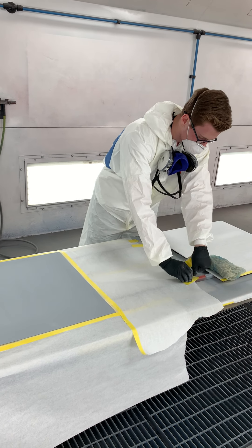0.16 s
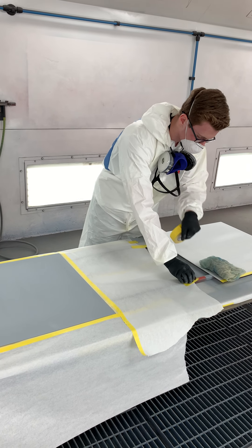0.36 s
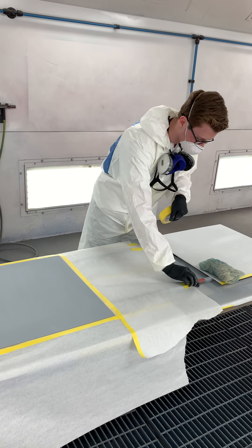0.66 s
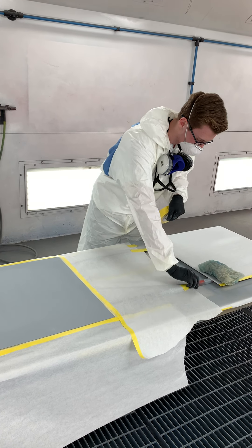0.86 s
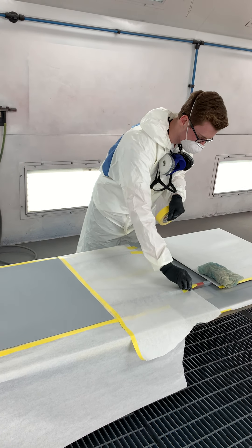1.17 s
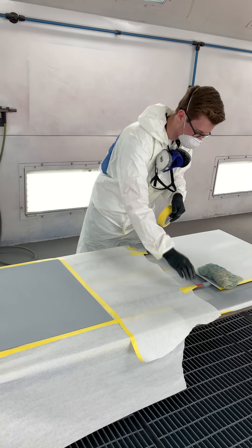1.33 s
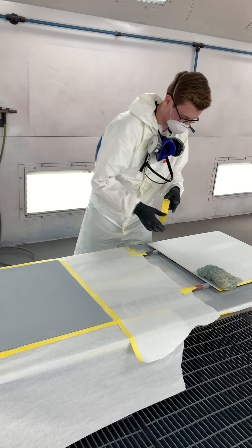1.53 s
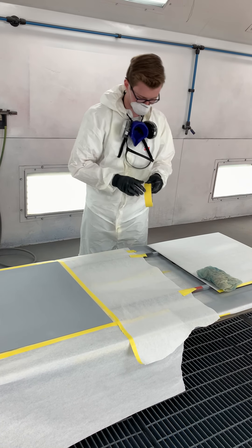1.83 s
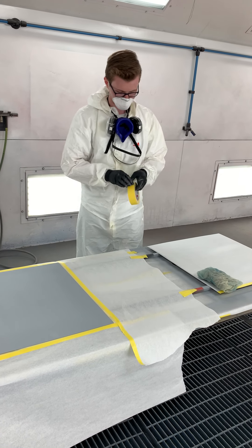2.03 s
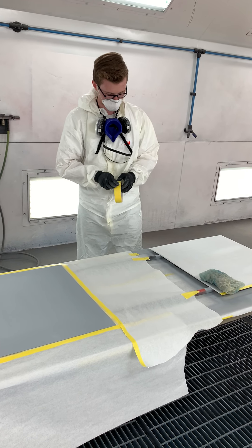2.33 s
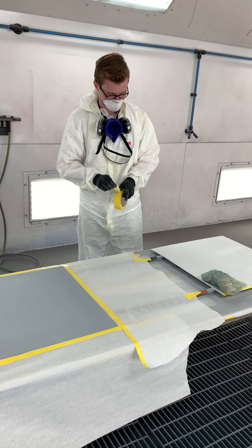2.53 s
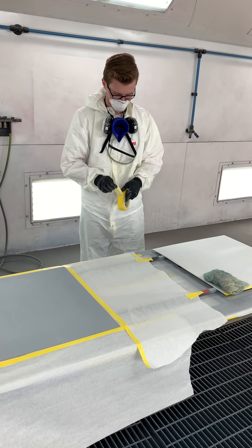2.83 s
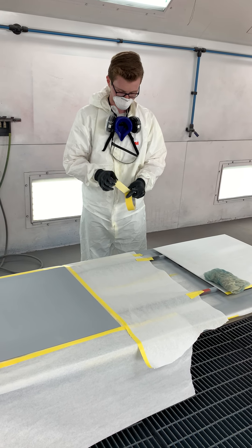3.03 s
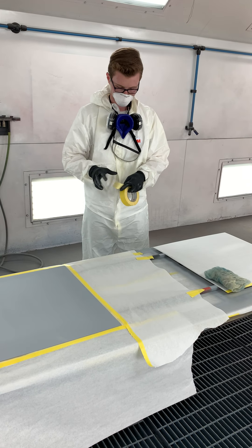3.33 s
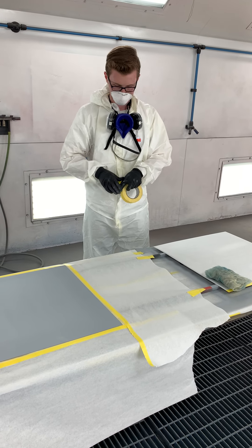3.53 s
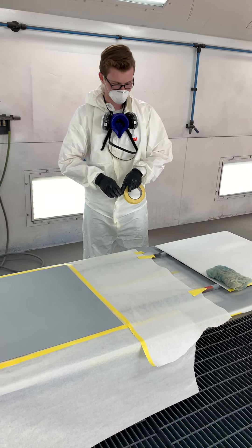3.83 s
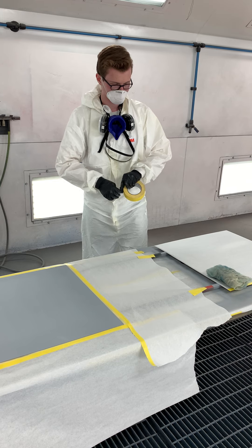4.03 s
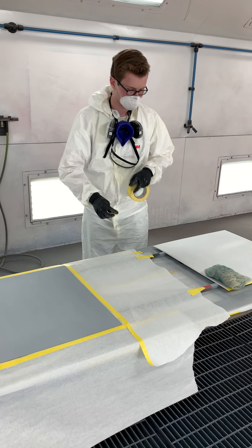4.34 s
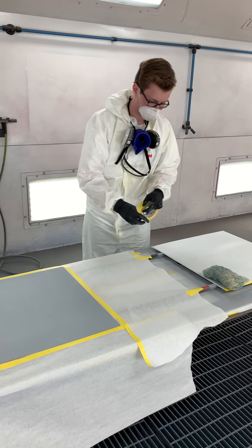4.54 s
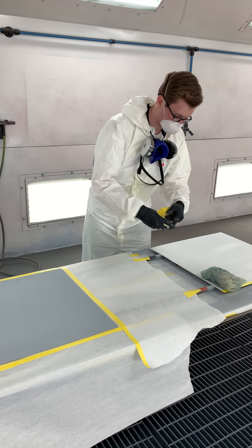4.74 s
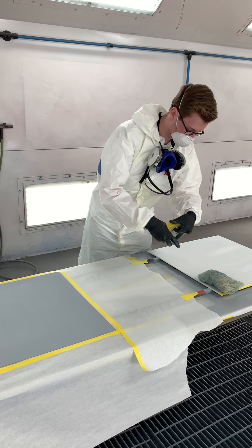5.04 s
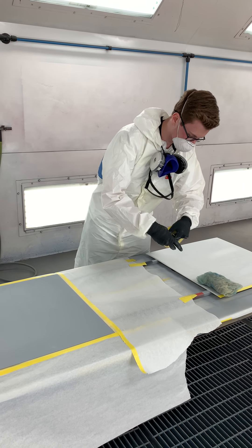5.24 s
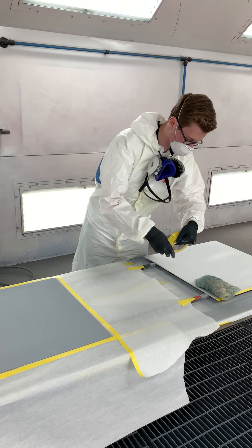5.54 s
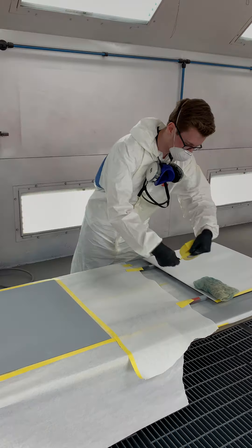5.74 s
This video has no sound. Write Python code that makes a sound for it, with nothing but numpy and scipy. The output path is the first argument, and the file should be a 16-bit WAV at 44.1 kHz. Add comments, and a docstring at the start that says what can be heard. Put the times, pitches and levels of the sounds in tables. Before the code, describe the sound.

In a bare steel spray booth, ventilation rumbles and lamps hum throughout. Gloves rustle and crackle on masking paper for the first second and a half. Around two and a half seconds tape peels off the roll in a brief rip, then tears with a loud snap. Sparse handling follows, with a sharp click just after four seconds. A stereo phone a few steps away catches the ringing walls.

```python
"""Over a steady ventilation rumble and lamp hum, gloves and tape rustle on paper from the start, with small cracks.
A painter in a paper coverall presses masking tape onto masking paper in a steel spray booth; about two and
a half seconds in he pulls a strip off the roll and tears it. Rips and rustles are grains of crackle shaped by
filters, cracks and pops are decaying noise bursts, and fan, lamps and booms are sines and shaped noise.
The bare walls ring after each handling sound; a phone with two microphone ports stands a few steps away."""
import sys
import numpy as np
from scipy import signal
from scipy.fft import rfft, irfft, next_fast_len
from scipy.io import wavfile
from scipy.ndimage import uniform_filter1d

SR = 44100
rng = np.random.default_rng(int(sys.argv[2]) if len(sys.argv) > 2 else 0)


def master_out(mix):
    """Clip the mix to full scale and print it as 16-bit PCM to the path in sys.argv[1]."""
    frames = np.transpose(np.atleast_2d(mix))
    ceiling = np.clip(frames, -1, 1)
    pcm = np.round(ceiling * 32767).astype(np.int16)
    wavfile.write(sys.argv[1], SR, pcm)


N = 259749
TIME = np.arange(N) / SR


def amp(db):
    """Decibel law: 20 dB is a factor of ten in amplitude."""
    return 10 ** (np.asarray(db) / 20)


def evened(x):
    """Normalisation to unit mean power: scales x to rms 1."""
    return x / np.sqrt(np.mean(x ** 2) + 1e-20)


def wander(seconds):
    """Random modulation: white noise smoothed over this time, at rms 1."""
    return evened(uniform_filter1d(rng.standard_normal(N), max(int(seconds * SR), 1)))


def arch(middle, length):
    """Raised-cosine envelope: a smooth swell from 0 to 1 and back over the length."""
    phase = np.pi * np.clip((TIME - middle) / length, -.5, .5)
    return np.cos(phase) ** 2


def read(points, hz):
    """Logarithmic frequency scale: joins the points of a spectrum table along it."""
    f, value = np.transpose(points)
    return np.interp(np.log(hz + 1), np.log(f + 1), value)


def follow(rows, t):
    """Linear interpolation of a (time, value) curve at times t."""
    seconds, value = np.transpose(rows)
    return np.interp(t, seconds, value)


def add(mix, s, sound):
    """Superposition: lays a sound into the mix at time s."""
    part = mix[max(round(s * SR), 0):][:len(sound)]
    part += sound[:len(part)]


def colour(x, spectrum, tilt=0, peaks=(), size=2048):
    """Minimum-phase filtering at unit energy; the tilt in dB per octave acts above 500 Hz."""
    hz = abs(np.fft.fftfreq(size, 1 / SR))
    db = read(spectrum, hz) + tilt * np.log2(np.maximum(hz, 500) / 500)
    db = db + sum(lift / (1 + (2 * (hz - f) / width) ** 2) for f, width, lift in peaks)
    # the Hilbert transform of the log gain gives the minimum phase
    response = np.exp(np.conj(signal.hilbert(np.log(amp(db)))))
    taps = np.fft.ifft(response).real[:size // 2]
    return signal.oaconvolve(x, taps / np.linalg.norm(taps))[:len(x)]


def crackle(per_s, spread_db, clump_db, clump_s):
    """Stick-slip friction: impulses of random size and sign whose strength clumps in time, at rms 1."""
    happens = rng.random(N) < per_s / SR
    size = rng.exponential(1, N)
    sign = rng.choice([-1, 1], N)
    clumps = wander(clump_s)
    size_db = spread_db * np.minimum(size, np.pi) + clump_db * np.clip(clumps, -2, 2)
    return evened(happens * sign * amp(size_db))


def wash(spectrum):
    """Turbulence noise: two unrelated steady Gaussian noises shaped to this spectrum, at rms 1."""
    size = next_fast_len(N)
    shape = amp(read(spectrum, np.fft.rfftfreq(size, 1 / SR)))
    return evened(irfft(rfft(rng.standard_normal((2, size))) * shape)[:, :N])


def resonate(x, hz, width):
    """Heterodyne resonance: shifts x down by the curve hz, low-passes it with a double pole and shifts it back."""
    turn = np.exp(2j * np.pi * np.cumsum(hz) / SR)
    r = np.exp(-np.pi * width / SR)
    slow = signal.lfilter([(1 - r) ** 2], [1, -2 * r, r * r], x / turn + 1e-18)
    return 2 * (turn * slow).real


def buckle(x, depth_db, patch_hz, patch_s, size=256):
    """Changing modes of a thin sheet: its shape changes, so patches of its spectrum swell and sink at random."""
    z = signal.stft(x, nperseg=size)[2]
    patch_bins = max(round(patch_hz * size / SR), 1)
    patch_frames = max(round(2 * patch_s * SR / size), 1)
    field = uniform_filter1d(rng.standard_normal(z.shape), patch_bins, axis=0)
    field = evened(uniform_filter1d(field, patch_frames, axis=1))
    gain = evened(amp(depth_db * np.clip(field, -2, 2)))
    return signal.istft(z * gain, nperseg=size)[1][:len(x)]


# Spectra of the duct drone, the rumble and the rush of air.
# Each row: frequency in Hz, relative density in dB per Hz.
DUCT_DRONE = [(15, -43.5), (27, -33.5), (35, 1.5), (41, -4), (52, -6), (70, -14), (150, -75.5)]
DUCT_RUMBLE = [(30, -48), (55, -1), (75, 3.5), (88, 3), (108, 5.5), (140, -22), (300, -59)]
AIR_RUSH = [(60, -11), (130, 7), (180, 0.5), (280, 3.5), (400, -2.5), (600, -8.5), (1000, -24.5),
            (3000, -28), (8000, -40), (16000, -39)]
AIR_DB = -57.5
RUMBLE_DB, SURGE_DB, SURGE_S = -53, 2.5, 0.35  # level, random swell, time over which the swell is smoothed
FAN_HZ = 74.8  # blade rate


def ventilation():
    """Fan and duct noise: shaped turbulence, and sines at the blade rate and half of it with wandering phase."""
    drone = amp(-51.5) * wash(DUCT_DRONE)
    rumble = amp(RUMBLE_DB + SURGE_DB * wander(SURGE_S)) * wash(DUCT_RUMBLE)
    air = amp(AIR_DB) * wash(AIR_RUSH)
    blade = amp(-57.5) * np.sin(2 * np.pi * FAN_HZ * TIME + .5 * wander(1 / 3))
    # half the blade rate, buffeted by the air
    shaft = amp(-48.5) * np.sin(np.pi * FAN_HZ * TIME + 1.34 * wander(1 / 14))
    return drone + rumble + air + blade + shaft


WHISTLE_HZ, WHISTLE_DB, WHISTLE_WAVER = 536, -67.5, .25  # pitch, rms level, rms phase wander in radians


def whistle():
    """Standing wave: a faint fan tone between the walls meets the two ports in opposite phase."""
    phase = 2 * np.pi * WHISTLE_HZ * TIME + WHISTLE_WAVER * wander(1 / 4)
    tone = np.sqrt(2) * amp(WHISTLE_DB) * np.sin(phase)
    return np.array([tone, -tone])


# Swelling and sinking of the lowest hum line. Each row: time in seconds, rms level in dB.
HUM_LEVEL = [(0, -62), (.5, -55.5), (.8, -60), (1.15, -55.5), (1.7, -70.5), (2.3, -56), (2.95, -57.5),
             (3.3, -55), (3.75, -54), (4, -67), (4.9, -57), (5.25, -52), (5.8, -52.5)]
# Steady upper lines of the hum. Each row: frequency in Hz, rms level in dB.
HUM_OVERTONES = [(240, -63), (720, -76)]
HUM_HZ = 120


def lamps():
    """Harmonic mains hum: sines at multiples of one pitch, the lowest swelling and sinking."""
    lines = [(HUM_HZ, follow(HUM_LEVEL, TIME))] + HUM_OVERTONES
    return sum(np.sqrt(2) * amp(db) * np.sin(2 * np.pi * (hz * TIME + rng.random())) for hz, db in lines)


# Movements of arms and body that rub the coverall. Each row: middle in seconds, length in seconds,
# level in dB before the common trim, tilt in dB per octave.
RUBS = [(0.244, 1.55, -56.5, -0.5), (0.76, 0.98, -57, -1.5), (1.467, 1.02, -55, -1), (2.143, 1.67, -61, 0),
        (3.443, 0.41, -60.5, 1.5), (3.676, 0.18, -60.5, 4), (4.135, 0.78, -67, 1), (4.537, 1.7, -58.5, -2),
        (5.031, 0.795, -68.5, -3.5), (5.205, 0.38, -67.5, -5), (5.98, 1.21, -55.5, 1),
        (5.9, 0.79, -62.5, 2.5)]
# Spectrum of rubbed cloth. Each row: frequency in Hz, relative density in dB per Hz.
CLOTH_SPECTRUM = [(150, 2.5), (400, -1), (900, -2), (1600, 1.5), (2600, 2), (4000, 2), (7000, -10),
                  (11000, -14.5), (16000, -25.5)]


def coverall():
    """Cloth friction: crackle of soft rubbing that swells and sinks with each movement."""
    grain = crackle(per_s=7000, spread_db=2.0, clump_db=0.0, clump_s=0.004)
    rubs = sum(amp(db) * colour(grain * arch(middle, length), CLOTH_SPECTRUM, tilt)
               for middle, length, db, tilt in RUBS)
    return amp(-2.0) * rubs


# Leans and shifts of weight that make panel and floor grating boom. Each row: middle in seconds,
# length in seconds, level in dB, pitch in Hz.
WEIGHT_SHIFTS = [(0.298, 0.79, -50.5, 75.3), (0.827, 0.77, -52.5, 105.2), (1.377, 0.4, -53.5, 109.3),
                 (4.402, 0.29, -46, 76.66)]
BOOM_WAVER = .4  # rms phase wander in radians


def grating():
    """Low plate modes: a soft sine boom with wavering phase under each shift of weight."""
    waver = BOOM_WAVER * wander(1 / 12)
    return sum(np.sqrt(2) * amp(db) * arch(middle, length) * np.sin(2 * np.pi * hz * TIME + waver)
               for middle, length, db, hz in WEIGHT_SHIFTS)


# Folds of sleeve or tape sliding past. Each row: middle in seconds, length in seconds,
# level in dB before the common trim, first and last pitch of the hollow in Hz.
FOLD_SLIDES = [(0.04, 0.17, -55, 3270, 3100), (0.203, .3, -49, 2430, 2250), (0.784, 0.12, -52, 696, 1080),
               (1.852, 0.83, -71, 2030, 1702), (2.482, 0.13, -50, 1190, 840),
               (4.331, 0.054, -44, 2860, 3260), (4.256, 1, -64.5, 515, 696), (4.94, 0.87, -67.5, 900, 1326),
               (5.147, 0.56, -67.5, 2280, 1980), (5.295, 0.34, -70, 1145, 1345),
               (5.779, 0.26, -82, 800, 1067)]
HOLLOW_WIDTH_HZ = 680  # of each of the two poles


def swishes():
    """Cavity resonance: the crackle of a sliding fold heard through a hollow whose pitch drifts."""
    grain = crackle(per_s=2900, spread_db=1.0, clump_db=2.5, clump_s=0.01)
    out = np.zeros(N)
    for middle, length, db, first_hz, last_hz in FOLD_SLIDES:
        on = abs(TIME - middle) < length / 2
        pitch = np.linspace(first_hz, last_hz, on.sum())
        rustle = resonate(grain[on], pitch, HOLLOW_WIDTH_HZ)
        out[on] += amp(db) * arch(middle, length)[on] * evened(rustle)
    return amp(-5.5) * out


# Strokes of glove and tape on paper. Each row: start in seconds, level in dB, length in seconds,
# tilt in dB per octave.
PAPER_STROKES = [(0.0, -44, 0.0032, 2.5), (0.139, -46, 0.0052, -0.5), (0.177, -44, 0.003, 1.5),
                 (0.258, -44, 0.016, 1.5), (0.29, -50, 0.02, 4.5), (0.45, -57.5, 0.02, 8.5),
                 (0.486, -46, 0.057, 1), (0.53, -53, 0.011, 14.5), (0.59, -49.5, 0.0071, 6.5),
                 (0.729, -45, 0.09, 0.5), (0.803, -42.5, 0.02, 3), (0.936, -41.5, 0.063, -1),
                 (1.182, -32.5, 0.029, 1.5), (1.284, -44.5, 0.11, 0), (1.642, -57, 0.077, -3.5),
                 (2.071, -59.5, 0.028, 5), (2.278, -64, 0.11, 13), (3.058, -51.5, 0.097, 7),
                 (3.203, -53, 0.062, 3.5), (3.857, -64, 0.009, -1.5), (3.979, -67, 0.041, 14),
                 (4.1033, -32.5, 0.024, 8), (4.29, -47.5, 0.068, 6.5), (4.558, -56, 0.036, 13),
                 (4.68, -62, 0.046, 12), (4.737, -54, 0.074, 6.5), (5.058, -64, 0.024, 4),
                 (5.528, -64, 0.0099, 8.5)]
# Spectrum of handled paper. Each row: frequency in Hz, relative density in dB per Hz.
PAPER_SPECTRUM = [(100, -13), (250, -1), (500, -5.5), (1000, 0.5), (1800, 5), (2500, 3), (4000, 5),
                  (6500, -1), (9000, -7), (12500, -13), (16000, -22)]
# Resonances of the paper over the panel. Each row: frequency in Hz, width in Hz, lift in dB.
SHEET_MODES = [(590, 63, 3), (831, 86, 6.5), (1770, 290, 5), (2600, 390, 7)]
STROKE_RISE, STROKE_FADE_S = 0.47, 0.033  # share of the length spent swelling; decay time afterwards
CREASES_PER_S, CREASES_DB = 250, -8.5  # stray ticks within a stroke: rate, level against the rustle


def strokes():
    """Friction on a resonant sheet: each stroke is a short swell of crackle, tilted by its row."""
    out, t = np.zeros(N), np.arange(SR // 4) / SR
    rustle = crackle(per_s=10000, spread_db=1.2, clump_db=0.8, clump_s=0.0037)
    ticks = crackle(per_s=CREASES_PER_S, spread_db=1.5, clump_db=0.0, clump_s=0.0076)
    grain = rustle + amp(CREASES_DB) * ticks
    for s, db, length, tilt in PAPER_STROKES:
        rise = np.minimum(t / (STROKE_RISE * length), 1)
        swell = rise * np.exp(-np.maximum(t - length, 0) / STROKE_FADE_S)
        slips = grain[max(round(s * SR), 0):][:len(t)]
        add(out, s, amp(db) * colour(slips * swell[:len(slips)], PAPER_SPECTRUM, tilt, SHEET_MODES))
    return out


# Creases snapping over. Each row: start in seconds, level in dB, decay time in seconds,
# tilt in dB per octave.
CREASE_SNAPS = [(0.138, -31.5, 0.0014, 1.5), (0.145, -39, 0.0022, 2), (0.1758, -31.5, 0.0024, 5),
                (0.267, -33, 0.0028, 5), (0.283, -38, 0.0011, 10), (0.548, -38.5, 0.0018, 12),
                (0.776, -25, .0004, 10), (0.7875, -23.5, 0.0044, 6), (0.8252, -22.5, 0.0009, 10),
                (0.956, -39.5, 0.00098, 4), (0.9612, -25.5, 0.0011, 8), (0.9692, -18, 0.0006, 18.5),
                (1.207, -26, .0004, 18), (1.294, -29.5, 0.0013, 5), (1.3425, -28, 0.0021, 11),
                (1.379, -30.5, 0.00078, 13), (1.389, -32.5, 0.00088, 9), (1.463, -35.5, 0.0022, 8),
                (2.48, -25, 0.0064, 11.5), (2.933, -13, .005, 13), (2.946, -14, 0.0012, 12.5),
                (3.108, -32.5, 0.0023, 5), (3.2381, -34, 0.0033, 7), (4.108, -27.5, 0.0019, 6),
                (4.333, -28, 0.0028, 3), (4.337, -28, 0.0017, 7.5), (4.768, -37, 0.0069, 4),
                (5.5466, -46, 0.00099, 9)]
SNAP_RISE_S = 0.00013


def snaps():
    """Snap-through buckling: a crease flips with a sharp noise crack that dies within milliseconds."""
    out, t = np.zeros(N), np.arange(SR // 20) / SR
    for s, db, ring, tilt in CREASE_SNAPS:
        rise = np.minimum(t / SNAP_RISE_S, 1)
        decay = np.exp(-np.maximum(t - SNAP_RISE_S, 0) / ring)
        crack = rng.choice([-1, 1], len(t)) * rise * decay
        add(out, s, amp(db) * colour(crack, PAPER_SPECTRUM, tilt))
    return out


# Flicked taut patches of paper or tape. Each row: start in seconds, level in dB, pitch in Hz.
PATCH_POPS = [(0.141, -40, 1840), (0.264, -44, 1990), (0.435, -46, 1580), (0.775, -35.5, 1850),
              (0.97, -51, 1910), (1.189, -38.5, 1750), (1.221, -41, 570), (1.246, -38, 284),
              (1.291, -36, 284), (1.463, -37.5, 1760), (2.876, -43.5, 970), (3.039, -43.5, 1580),
              (4.109, -36, 2700), (4.112, -42, 790), (4.332, -33, 2850), (4.766, -43, 2860)]
POP_FADE_S = 0.0055


def pops():
    """Membrane vibration: a flicked taut patch flutters as decaying noise around its own pitch."""
    out, t = np.zeros(N), np.arange(SR // 10) / SR
    for s, db, hz in PATCH_POPS:
        flutter = rng.choice([-1, 1], len(t)) * np.exp(-t / POP_FADE_S)
        band = [(hz / 2, -25), (hz, 0), (hz * 2, -25), (hz * 4, -50)]
        add(out, s, amp(db) * colour(flutter, band))
    return out


# Fizz of parting glue and fibres. Each row: frequency in Hz, relative density in dB per Hz.
GLUE_SPECTRUM = [(300, -37), (1000, -6), (2500, -6), (4200, -1), (6500, 1), (9000, 6), (11500, 3.5),
                 (13500, -3.5), (16000, -8.5)]
FLAP_S = 0.015  # time over which the flapping of the free strip is smoothed


def rip(rows, slips, strip, drum_db, drum_lag, flap_db, rings=()):
    """Progressive fracture: each slip of glue or fibre fizzes and drums on the flapping free strip."""
    pull_db = follow(rows, TIME)
    start, end = rows[0][0], rows[-1][0]
    ease_db = pull_db - pull_db.max()
    drive = slips * amp(pull_db) * (TIME > start) * (TIME < end)
    crisp = amp(.5 * ease_db)  # a hard pull snaps the threads more sharply
    sharp_fizz = colour(drive * crisp, GLUE_SPECTRUM, tilt=0.12, peaks=rings)
    dull_fizz = colour(drive * (1 - crisp), GLUE_SPECTRUM, tilt=-1.0, peaks=rings)
    # the drumming follows the pull less than the fizz does
    drum = drive * amp(drum_db - drum_lag * ease_db + flap_db * wander(FLAP_S))
    return sharp_fizz + dull_fizz + colour(drum, strip, peaks=rings)


# Pull that peels the strip off the roll. Each row: time in seconds, level in dB before trims.
PEEL_PULL = [(2.43, -67), (2.504, -43), (2.509, -31), (2.533, -26.5), (2.56, -24.5), (2.59, -26.5),
             (2.625, -38.5), (2.66, -53.5)]
# Lowest mode of the free strip, falling as the strip gets longer. Each row: time in seconds, frequency in Hz.
STRIP_PITCH = [(2.505, 3070), (2.527, 1206), (2.545, 834), (2.567, 539), (2.592, 456), (2.625, 394)]
STRIP_DB, STRIP_WIDTH_HZ = 7.5, 102  # level of the lowest mode against the pull, width of each pole
STRIP_FALL_DB, STRIP_FOLLOW = -4.5, 0.8  # dB per octave of mode number, share of the pull followed in dB


def strip_modes(slips, count=7):
    """Harmonic string modes: the slips pluck the taut strip, and its modes sweep down as it lengthens."""
    pull_db = follow(PEEL_PULL, TIME)
    hz = follow(STRIP_PITCH, TIME)
    on = (TIME > STRIP_PITCH[0][0]) & (TIME < PEEL_PULL[-1][0])
    ease_db = pull_db - pull_db.max()
    drive = slips * amp(STRIP_DB + pull_db.max() + STRIP_FOLLOW * ease_db)
    out = np.zeros(N)
    for k in range(1, count + 1):
        mode = resonate(drive[on], k * hz[on], STRIP_WIDTH_HZ)
        out[on] += amp(STRIP_FALL_DB * np.log2(k)) * mode
    return out


SHORT_CUT_DB = 11.5  # loss in dB per octave below the lowest mode, over at most two octaves


def short_strip(x, size=384):
    """Radiation cutoff: a strip radiates little below its lowest mode, so the peel opens downward."""
    overlap = size - size // 4
    hz, t, z = signal.stft(x, SR, nperseg=size, noverlap=overlap)
    octaves_under = np.clip(np.log2(follow(STRIP_PITCH, t) / (hz[:, None] + 1)), 0, 2)
    return signal.istft(z * amp(-SHORT_CUT_DB * octaves_under), nperseg=size, noverlap=overlap)[1][:len(x)]


# Pull that tears the strip across. Each row: time in seconds, level in dB before trims.
TEAR_PULL = [(2.858, -44.5), (2.869, -35), (2.873, -29.5), (2.915, -25), (2.935, -18), (2.941, -22.5),
             (2.955, -32), (2.965, -35.5), (2.995, -46), (3.02, -51), (3.06, -54)]
# Drumming of the strip, taut while peeled and slack while torn.
# Each row: frequency in Hz, relative density in dB per Hz.
TAUT_SPECTRUM = [(150, -24), (340, -27), (470, 3), (700, -6.5), (950, -1.5), (1600, 0), (2400, 2),
                 (3400, 9), (5500, 2.5), (12000, 0)]
SLACK_SPECTRUM = [(100, -21), (210, -5), (400, -1.5), (700, -3.5), (1100, -6.5), (2000, -12.5), (3600, 1.5),
                  (5500, -7), (12000, -14.5)]
# Narrow resonances of the booth excited by the peel. Each row: frequency in Hz, width in Hz, lift in dB.
BOOTH_MODES = [(1370, 30, 5), (1700, 28, 8), (1958, 30, 5), (2243, 40, 10), (3235, 50, 5), (3400, 60, 2),
               (6092, 45, 9), (6245, 90, 5)]
# Reflections off chest, arms and panel. Each row: delay in seconds, gain in dB.
NEAR_BOUNCES = [(.00098, -19), (.00145, -13.5), (.0036, -19)]


def tape():
    """Fracture with early reflections: a peel and an unevener tear bounce off painter and panel."""
    slips = crackle(per_s=7000, spread_db=-1.0, clump_db=0.0, clump_s=0.00031)
    peel = rip(PEEL_PULL, slips, TAUT_SPECTRUM, drum_db=-2.0, drum_lag=0.037, flap_db=1.5, rings=BOOTH_MODES)
    tear_slips = crackle(per_s=12000, spread_db=-2.0, clump_db=1.0, clump_s=0.0045)
    tear = rip(TEAR_PULL, tear_slips, SLACK_SPECTRUM, drum_db=-15.0, drum_lag=0.49, flap_db=-3)
    both = amp(1.3) * short_strip(peel) + amp(-0.5) * tear
    direct = buckle(both, depth_db=4, patch_hz=400, patch_s=.015) + strip_modes(slips)
    out = direct.copy()
    for delay, db in NEAR_BOUNCES:
        add(out, delay, amp(db) * direct)
    return out


# Direct sound of the strip toward the phone, weakest around 11 kHz.
# Each row: frequency in Hz, relative gain in dB.
STRIP_TOWARD_PHONE = [(400, -2), (2200, -2.5), (4500, -0.5), (11000, -6), (16000, -0.5)]


def toward_phone(rips):
    """Directivity: the part of the strip's sound that it radiates toward the phone."""
    return amp(-0.5) * colour(rips, STRIP_TOWARD_PHONE)


# Reverberation time of the booth. Each row: frequency in Hz, time to fall by 60 dB in seconds.
REVERB_TIME = [(200, 1), (1000, 0.74), (2500, 0.7), (5500, 0.61), (8000, 0.41), (11000, 0.33),
               (16000, 0.38)]
# Strength of the echoes. Each row: frequency in Hz, gain in dB over the sound sent into the booth.
REVERB_GAIN = [(200, 5.5), (1000, 5), (2500, -0.5), (5500, -1), (10000, -6), (16000, -13)]


def booth(x):
    """Diffuse reverberation: dense wall echoes for two ports, their pattern drifting in a steady one-second cycle."""
    taps = rng.standard_normal((3, 2, SR)) * (rng.random((3, 2, SR)) < .15)
    hz, t, z = signal.stft(taps, SR, nperseg=256)
    t60 = read(REVERB_TIME, hz)[:, None]
    z = z * np.exp(-np.log(1000) * t / t60) / np.sqrt(t60)
    onset = np.clip((TIME[:SR] - .003) / 0.0038, 0, 1)
    tails = signal.istft(z, SR, nperseg=256)[1][..., :SR] * onset
    tails = tails / np.linalg.norm(tails, axis=-1, keepdims=True)
    tails = irfft(rfft(tails) * amp(read(REVERB_GAIN, np.fft.rfftfreq(SR, 1 / SR))))
    # three patterns trade places at constant total power
    drift = np.sqrt(2 / 3) * np.cos(2 * np.pi * (TIME + np.arange(3)[:, None] / 3))
    return sum(signal.oaconvolve((x * share)[None], tail, axes=1)[:, :N] for share, tail in zip(drift, tails))


# Likeness of the diffuse field at the ports. Each row: frequency in Hz, left-right coherence from -1 to 1.
COHERENCE = [(60, 1), (150, 0.97), (300, 0.8), (560, -0.021), (900, -0.18), (2000, -0.046), (3300, 0.65),
             (4400, 0.95), (16000, 1)]
# Level balance of the ports. Each row: frequency in Hz, left minus right in dB.
PORT_BALANCE = [(30, 0.5), (120, -1.5), (300, -3.5), (800, -0.7), (2500, -0.1), (5000, 0)]
# Phase between the ports. Each row: frequency in Hz, lag of the right port in radians.
RIGHT_LAG = [(0, 0), (400, .1), (560, .9), (900, .4), (1500, .7), (2400, 2.4), (3500, 1.4), (4650, 3.14),
             (15300, 18.85), (22050, 19)]
# Echoes off the opposite wall. Each row: frequency in Hz, level against the other echoes in dB.
OPPOSITE_ECHO = [(100, -65.5), (2500, -28), (4500, -5), (16000, -0.5)]


def ports(direct, diffuse):
    """Phase and coherence between two ports: the right port lags, but leads for opposite-wall echoes."""
    size = next_fast_len(N + SR // 10, True)
    hz = np.fft.rfftfreq(size, 1 / SR)
    a, b = rfft(diffuse, size)
    shared = rfft(direct, size)
    same = np.clip(read(COHERENCE, hz), -1, 1)
    lean = amp(read(PORT_BALANCE, hz) / 2)
    lag = np.exp(-1j * np.interp(hz, *np.transpose(RIGHT_LAG)))
    opposite = b * amp(read(OPPOSITE_ECHO, hz))
    left = shared + a + opposite
    right = (shared + same * a + np.sqrt(1 - same ** 2) * b) * lag + opposite / lag
    return irfft(np.array([left * lean, right / lean]), size)[:, :N]


def scene():
    """Superposition of direct and diffuse fields: tape, paper and cloth in the booth, over floor, fan and lamps."""
    rips, cracks = tape(), snaps()
    paper = buckle(strokes(), depth_db=1.5, patch_hz=700, patch_s=.02) + pops()
    cloth = buckle(coverall(), depth_db=4.5, patch_hz=500, patch_s=0.053) + swishes()
    echoes = booth(amp(-2.5) * rips + amp(-3.5) * paper + amp(-3.5) * cracks + cloth)
    direct = toward_phone(rips) + paper + cracks + cloth + lamps()
    diffuse = echoes + ventilation() + grating()
    return ports(direct, diffuse) + whistle()


LOW_CUT_HZ, EDGE_HZ = 30, 15800


def record(dry):
    """Band limiting: a steep low cut, then a linear-phase low-pass at the upper edge."""
    low_cut = signal.butter(6, LOW_CUT_HZ, "highpass", fs=SR, output="sos")
    cut = signal.sosfilt(low_cut, dry)
    low_pass = signal.firwin(511, EDGE_HZ, window=("kaiser", 9), fs=SR)
    return signal.oaconvolve(cut, low_pass[None], "same")


dry = scene()
out = record(dry)
master_out(out)
```